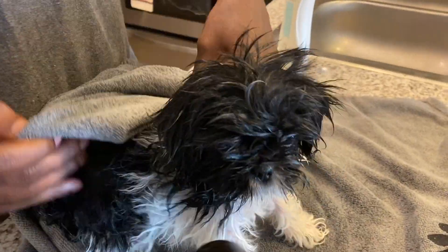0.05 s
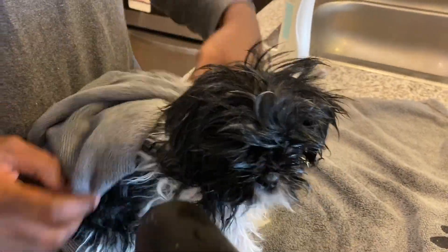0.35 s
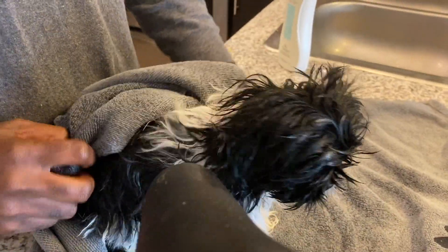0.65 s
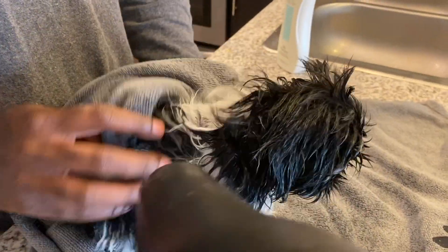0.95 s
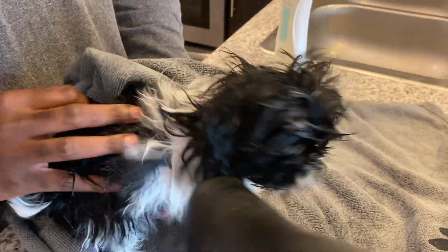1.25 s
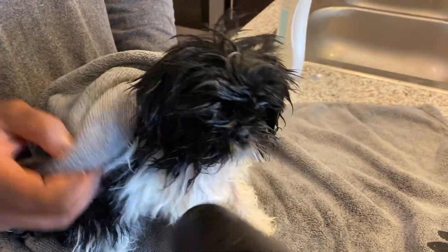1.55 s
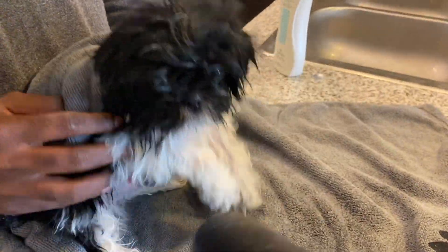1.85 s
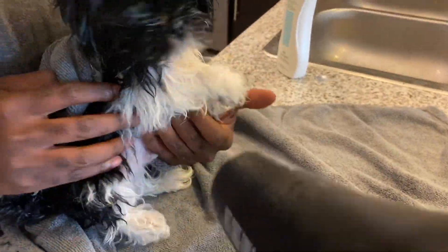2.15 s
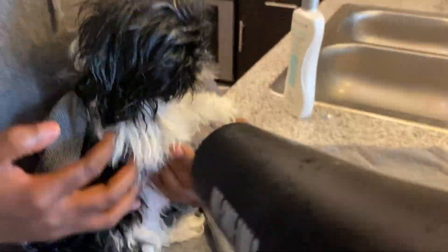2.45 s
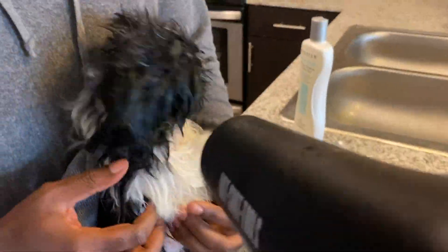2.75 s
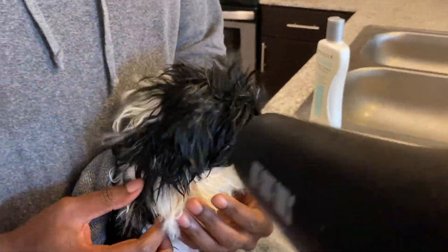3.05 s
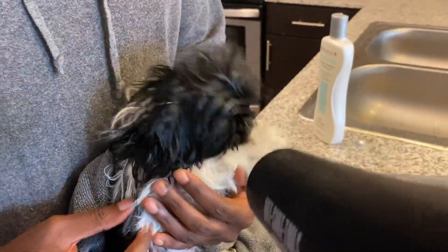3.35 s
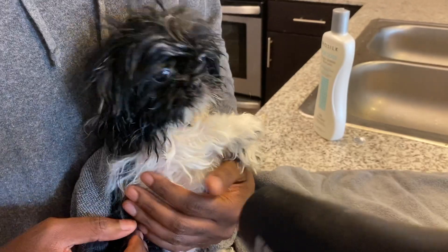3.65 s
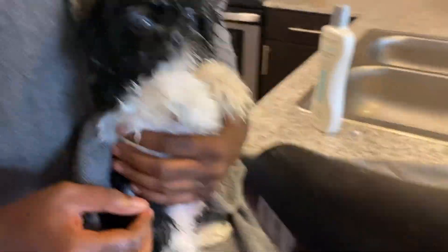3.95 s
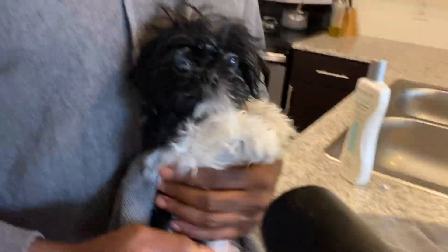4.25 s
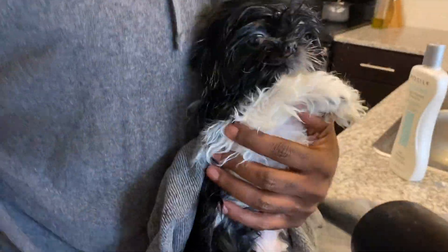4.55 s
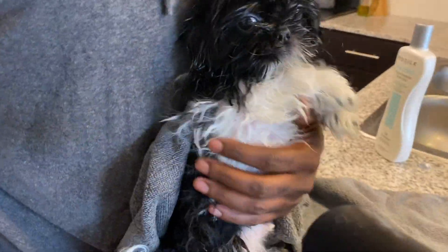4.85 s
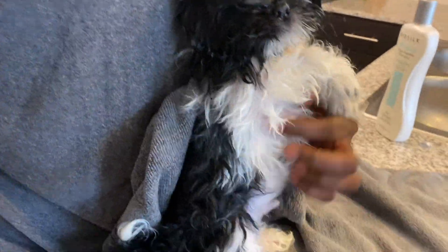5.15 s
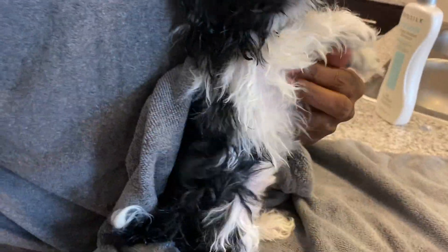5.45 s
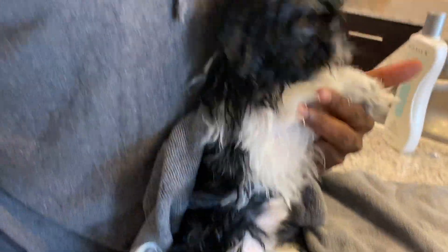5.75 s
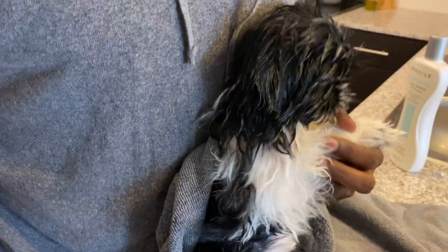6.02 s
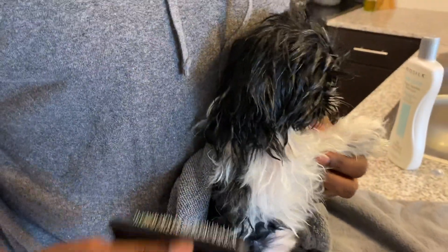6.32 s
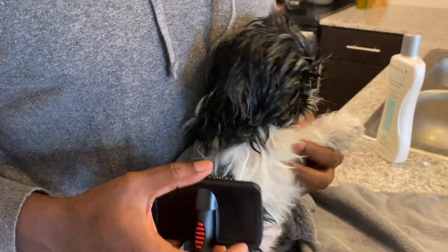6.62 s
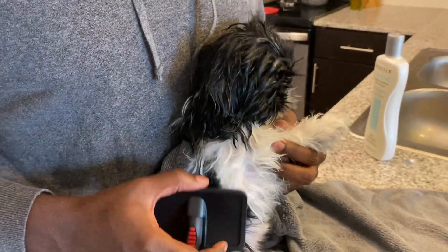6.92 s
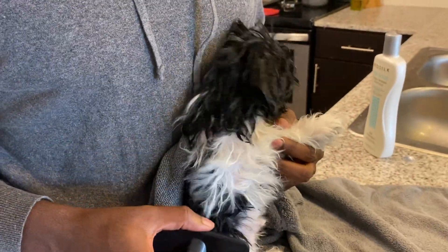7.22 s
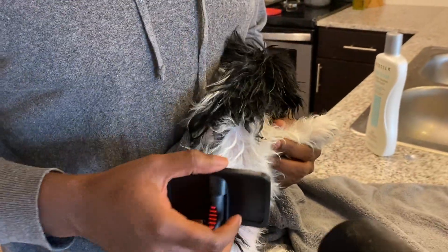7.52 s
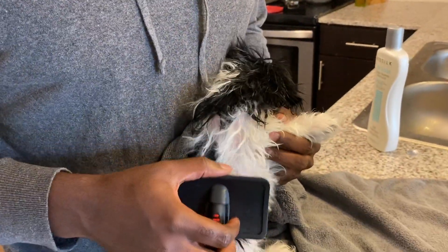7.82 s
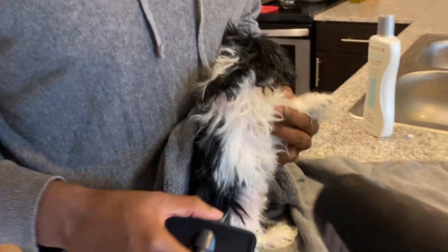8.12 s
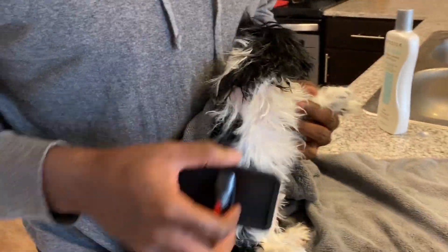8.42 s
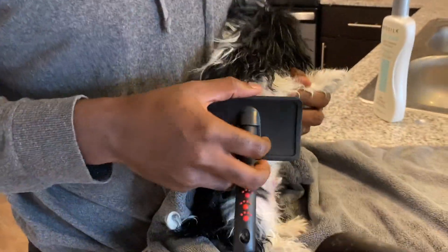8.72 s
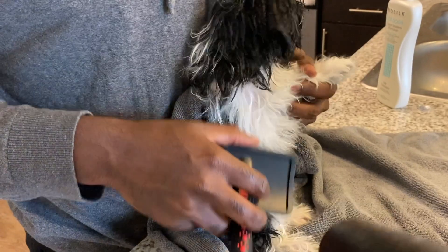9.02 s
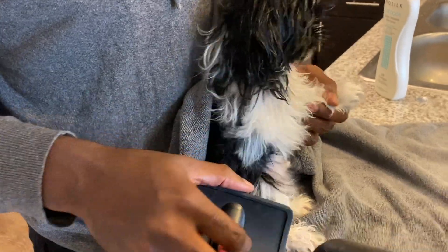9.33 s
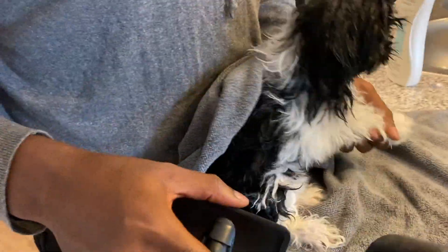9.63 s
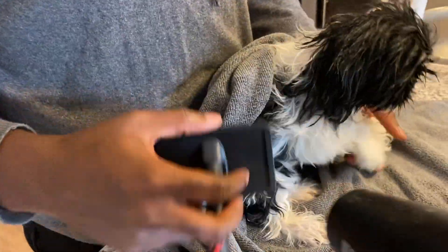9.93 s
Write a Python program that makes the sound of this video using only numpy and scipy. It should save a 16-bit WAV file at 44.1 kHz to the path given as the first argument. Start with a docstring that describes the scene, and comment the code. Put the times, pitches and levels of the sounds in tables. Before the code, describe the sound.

A hair dryer on low runs close to the microphone, drying a dog on a kitchen counter. Its hollow rush of air carries a faint fan whine and a thin motor sizzle, while gusts rumble softly on the microphone. The sound starts on the left and drifts right. About halfway, the jet swishes twice over the fur, then one light plastic knock rings briefly in the kitchen as the dryer blows on.

```python
"""Blow-drying a wet dog

A hair dryer on low moves over a dog on a kitchen counter, close to the microphone. Its fan roars
through the barrel and sings as the blades spin; its motor, fed half-waves of mains power, sizzles in
bursts. The air jet hisses in fur and towel and brushes the microphone. One light knock on plastic
makes the kitchen ring briefly."""
import sys
import numpy as np
from scipy import signal
from scipy.fft import rfft, irfft, next_fast_len
from scipy.io import wavfile
from scipy.ndimage import map_coordinates

SR = 44100
rng = np.random.default_rng(int(sys.argv[2]) if len(sys.argv) > 2 else 0)


def transcribe(u):
    """Save the signal u as a 16-bit wav file named by the first command-line argument.

    u: samples, shape (n,) or (channels, n), limited to [-1, 1]; the rate is SR.
    q: integer samples, one column per channel.
    """
    v = np.clip(np.atleast_2d(u).T, -1, 1)
    q = np.round(v * 32767).astype(np.int16)
    wavfile.write(sys.argv[1], SR, q)


N = 440118
T = np.arange(N) / SR
FREQS = np.maximum(np.arange(next_fast_len(N) // 2 + 1) * SR / next_fast_len(N), 1)
MAINS_HZ = 59.96

# How near the dryer is, given as the level of its roar: time_s, level_db
NEARNESS = [(0.0, -27), (0.8, -23), (1.25, -24), (1.5, -27), (2.05, -25.5), (2.6, -23.5), (3.0, -24),
            (3.45, -24.5), (3.75, -25), (4.0, -24.5), (4.3, -27.5), (5.3, -25), (5.8, -26.5), (6.35, -26),
            (6.9, -28), (7.3, -27), (8.0, -27), (8.3, -25), (8.65, -25.5), (9.2, -24.5), (9.6, -27),
            (9.98, -23)]
# Quick sweeps of the jet over the fur: time_s, half_length_s, strength (0-1), pitch_hz
FUR_SWEEPS = [(5.216, 0.061, 0.54, 2500), (5.515, 0.054, 0.6, 2500), (8.263, 0.048, 0.18, 2490),
              (8.534, 0.045, 0.18, 2650)]


def undb(db):
    """Turn decibels into a gain to multiply by."""
    return 10 ** (np.asarray(db) / 20)


def unit(x):
    """Scale a sound to an average (rms) level of 1."""
    return x / np.sqrt(np.mean(x ** 2))


def curves(table):
    """Join a timed table's points with straight lines, one curve per column."""
    times, *columns = np.transpose(table)
    return [np.interp(T, times, column) for column in columns]


def swell(time_s, half_length_s):
    """A smooth rise and fall around one moment."""
    return np.exp(-.5 * ((T - time_s) / half_length_s) ** 2)


def colour(x, gain):
    """Turn each frequency up or down by its own gain."""
    size = next_fast_len(N)
    return irfft(rfft(x, size) * gain, size)[..., :N]


def drift(rate_hz):
    """A smooth random wander of about 1 either way."""
    return unit(colour(rng.standard_normal(N), np.exp(-np.minimum(FREQS / rate_hz, 20) ** 2)))


def air_noise(spectrum, flutter_db, flutter_hz):
    """Three separate streams of noise that flutter together as swirls of air pass."""
    hz, db = np.transpose(spectrum)
    shape = undb(np.interp(np.log(FREQS), np.log(hz), db))
    fade_ends = np.minimum(FREQS / hz[0], 1) ** 4 * np.minimum(hz[-1] / FREQS, 1) ** 4
    streams = colour(rng.standard_normal((3, N)), shape * fade_ends)
    return unit(streams * undb(flutter_db * drift(flutter_hz)))


def resonance(x, hz, width_hz):
    """Keep one band of frequencies, whose centre may move."""
    turn = np.exp(2j * np.pi * np.cumsum(hz) / SR)
    pole = np.exp(-np.pi * width_hz / SR)
    return 2 * np.real(turn * signal.lfilter([1 - pole], [1, -pole], x * turn.conj()))


def moving_band(x, table, width_hz=146):
    """Boost or weaken one band that slides through the sound."""
    hz, boost_db = curves(table)
    return x + (undb(boost_db) - 1) * resonance(x, hz, width_hz)


def balance(pan_db):
    """Left and right gains at constant power; pan_db is left minus right."""
    sides = undb(np.array([pan_db, -pan_db]) / 2)
    return sides / np.sqrt(np.mean(sides ** 2, axis=0))


def arrive(x, lead_ms):
    """Sound reaches the nearer side first; a positive lead means the left."""
    shift = lead_ms * SR / 1000 / 2
    return np.array([map_coordinates(x, [np.arange(N) + side * shift], order=3, mode="nearest")
                     for side in (1, -1)])


def place(streams, pan_db, lead_ms, room_db):
    """One stream arrives directly; the other two are what the room scatters to left and right."""
    direct, *scattered = streams
    room = undb(room_db)
    both = arrive(direct, lead_ms) + room * np.array(scattered)
    return both * balance(pan_db) / np.sqrt(1 + room ** 2)


def hand_gain(usual_db, near, facing, nozzle_db, sweep_db):
    """A part's gain as the hand moves the dryer; near and facing are in dB per dB of their tables."""
    # How openly the air intake faces the microphone: time_s, level_db
    intake_facing = [(0.0, -35), (1.2, -34), (1.95, -35), (2.25, -43), (2.7, -43.5), (3.6, -39.5),
                     (4.05, -40.5), (4.3, -45), (4.8, -43), (5.1, -41), (6.42, -41), (6.58, -49.5),
                     (7.15, -43.5), (8.05, -42), (8.25, -39.5), (9.98, -39.5)]
    # The nozzle passes the microphone once: time_s, exposure (0-1)
    nozzle_pass = [(0, 0.16), (.55, 0.6), (1.1, 0.64), (1.4, 0.41), (1.85, 0.07), (2.25, 0)]
    near_db, = curves(NEARNESS)
    facing_db, = curves(intake_facing)
    exposure, = curves(nozzle_pass)
    sweep = sum(strength * swell(s, half_s) for s, half_s, strength, _ in FUR_SWEEPS)
    position_db = near * (near_db - near_db.mean()) + facing * (facing_db - facing_db.mean())
    return undb(usual_db + position_db + nozzle_db * exposure + sweep_db * sweep)


def barrel_roar(pan_db, lead_ms):
    """Air roars through the barrel, with a hollow resonance that swells and fades."""
    # Air in the barrel: pitch_hz, level_db
    spectrum = [(250, -27), (430, -16.5), (470, -8.5), (605, 2), (745, 0), (810, -1), (895, -1.5),
                (970, -4.5), (1070, -6), (1250, -15)]
    # The barrel's main resonance: time_s, pitch_hz, boost_db
    barrel_peak = [(0, 720, -3.5), (0.9, 720, 1.5), (2.1, 724, 1), (2.6, 706, 1.5), (3.4, 690, 3.5),
                   (4.0, 660, 1.5), (4.4, 700, -0.5), (6.8, 710, -0.5), (7.5, 666, 2.5), (8.7, 640, 2.5),
                   (9.2, 660, -0.5), (9.6, 666, -2), (9.98, 660, -7)]
    near_db, = curves(NEARNESS)
    roar = air_noise(spectrum, flutter_db=.5, flutter_hz=25) * undb(near_db + 0.28)
    return place(moving_band(roar, barrel_peak), pan_db, lead_ms, room_db=-8)


def grille_rush(pan_db, lead_ms):
    """Air rushes through the grille with a hollow colour that shifts with the aim."""
    # Air in the grille: pitch_hz, level_db
    spectrum = [(900, -15), (1130, -6), (1260, -2.5), (1440, 3.5), (1650, -0.5), (1830, 0.5), (2000, 2),
                (2125, 1), (2230, -7.5), (2600, -38)]
    # Its strongest colour: time_s, pitch_hz, boost_db
    grille_peak = [(0, 2050, -1), (1.2, 1980, 6), (2.1, 2100, 1.5), (2.45, 1680, 5), (3.9, 1690, 5.5),
                   (4.4, 2130, 3), (6.699, 2050, 2.5), (7.5, 1964, 4), (8.1, 2020, 4.5), (8.9, 1444, 0.5),
                   (9.98, 1440, 1)]
    rush = air_noise(spectrum, flutter_db=.5, flutter_hz=30)
    rush *= hand_gain(-29, near=0.8, facing=0.43, nozzle_db=-4, sweep_db=3)
    return place(moving_band(rush, grille_peak), pan_db, lead_ms, room_db=-6)


def glance(streams, strength=.16, wander=.04):
    """Hiss glances off moving hands, paws and bottle; five tiny echoes give it shifting colours."""
    out = streams.copy()
    for delay_s in np.geomspace(.0013, .0065, 5):
        earlier = np.arange(N) - SR * delay_s * (1 + wander * drift(.5))
        out += strength * np.array([np.interp(earlier, np.arange(N), x) for x in streams])
    return unit(out)


def jet_hiss():
    """The jet hisses on fur and cloth, and the gap between nozzle and dog resonates."""
    # The jet's hiss: pitch_hz, level_db
    spectrum = [(1500, -18), (2250, 1.5), (2450, 3.5), (2800, 2), (2980, 0.5), (3200, 0), (3450, -1.5),
                (4100, -2), (4550, -4), (4900, -5.5), (6000, -9), (7300, -6), (8300, -14.5), (10000, -62)]
    # The gap's lower and upper resonances: time_s, pitch_hz, boost_db
    lower_peak = [(0, 3160, 7), (0.6, 3400, 3.5), (1.3, 3280, 5), (2.1, 3380, 5.5), (2.4, 3700, -1),
                  (3.1, 4050, 1), (3.6, 3880, -8), (3.9, 3810, 5), (4.4, 3380, 8.5), (4.9, 3430, 3),
                  (5.25, 3470, 5.5), (5.802, 3250, -2), (6.399, 3330, 4.5), (7.0, 3430, 6.5),
                  (7.6, 3410, 6), (8.1, 3460, 3), (9.2, 3400, -4), (9.65, 4050, 3), (9.98, 3910, -2)]
    upper_peak = [(0, 5400, 1), (0.75, 5200, 2), (1.4, 5300, 0), (2.1, 5400, 6), (2.6, 4600, 2),
                  (3.1, 4600, 5), (3.75, 4120, -1), (4.3, 4400, 1), (5.0, 4040, 5.5), (5.5, 4300, -2),
                  (6.5, 4060, 0.5), (7.3, 4100, -4), (7.9, 4350, 1), (8.7, 4280, 4), (9.6, 4500, 2)]
    hiss = glance(air_noise(spectrum, flutter_db=0.54, flutter_hz=59.6))
    hiss *= hand_gain(-35, near=0.06, facing=0.34, nozzle_db=5.5, sweep_db=5.5)
    return moving_band(moving_band(hiss, lower_peak), upper_peak)


def sparks(turns):
    """The motor's brushes spark while current flows, most at one spot of each turn."""
    current = np.maximum(np.sin(2 * np.pi * MAINS_HZ * T + 1.8), 0)  # a diode blocks every other half-wave
    return current * (1 + .7 * np.sin(2 * np.pi * turns))


def rubbed_metal(rings, pressure):
    """Rubbing brushes make metal ring, more strongly the harder they press."""
    metal = sum((-1) ** k * undb(db) / (1 + 1j * (FREQS / hz - hz / FREQS) * hz / width_hz)
                for k, (hz, width_hz, db) in enumerate(rings))
    return unit(colour(rng.standard_normal((3, N)) * pressure, metal))


def motor_sizzle(sparking, pan_db):
    """Sparking brushes ring the motor's case and their holder, which beams out through the intake."""
    # Rings of the case and of the brush holder: pitch_hz, width_hz, level_db
    case_rings = [(5270, 260, -5), (6730, 260, 0), (7000, 340, -2.5), (7550, 600, -10)]
    holder_rings = [(6070, 280, 0), (6400, 400, -5)]
    # The brightest ring shifts as the intake turns: time_s, pitch_hz, boost_db
    bright_peak = [(0, 6990, 3.5), (1.3, 6900, 7.5), (1.85, 6200, -1.5), (2.4, 6000, 6.5), (3.05, 5470, 8),
                   (3.3, 6300, 3), (3.6, 6400, 2), (4.2, 6290, 3), (5.199, 6850, -2), (6.3, 6150, 3),
                   (6.7, 6600, 5.5), (7.499, 6800, 3.5), (8.5, 6740, 3.5), (9.1, 6100, 3.5),
                   (9.45, 5730, 6.5), (9.98, 6500, 2)]
    pressure = (1 + 0.55 * sparking) * undb(2.5 * drift(300))
    case = rubbed_metal(case_rings, pressure)
    case *= hand_gain(-47, near=0, facing=1.1, nozzle_db=-4.2, sweep_db=18)
    holder = rubbed_metal(holder_rings, pressure)
    holder *= hand_gain(-49, near=1, facing=2, nozzle_db=-19, sweep_db=15)
    sizzle = moving_band(case + holder, bright_peak, width_hz=810)
    return place(sizzle, pan_db, lead_ms=0, room_db=-10.5)


def high_hiss(sparking):
    """The dryer's high, airy hiss pulses with the motor."""
    # Tone of the high hiss: pitch_hz, level_db
    spectrum = [(4000, -12), (7400, 0), (9000, -2), (10300, 2.2), (12200, 1), (13200, -5.5), (14500, -3),
                (15800, -4)]
    hiss = glance(air_noise(spectrum, flutter_db=1, flutter_hz=50)) * undb(1.8 * sparking)
    hiss *= hand_gain(-47.4, near=0.04, facing=0.6, nozzle_db=7.2, sweep_db=7.5)
    return place(hiss, pan_db=np.zeros(N), lead_ms=0, room_db=1.5)


def fan_tones(turns, blade_db, waver_db=2.1, wobble_radians=.42):
    """Seven blades and a slightly unbalanced rotor sing; uneven inflow shakes every tone."""
    # Tones of fan and rotor: cycles_per_turn, offset_db
    harmonics = [(2, -18), (5, -5.5), (7, -0.3), (8, -6), (10, -11.5), (11, -12), (12, -6.5), (14, -7)]
    # The rotor's hum, one cycle per turn: time_s, level_db
    rotor_hum = [(0, -54), (1.0, -41.5), (1.9, -49), (2.5, -43.5), (3.3, -46.5), (4.1, -47.5), (4.7, -50),
                 (5.3, -53.5), (6.7, -54.5), (7.7, -49.5), (9.2, -51), (9.98, -59)]
    # The sixth harmonic swells and fades as the barrel turns: time_s, level_db
    sixth_harmonic = [(0, -37.5), (1.3, -43), (1.8, -42), (2.2, -37), (2.7, -38), (3.3, -38), (3.9, -42),
                      (4.6, -48), (5.7, -44), (6.6, -43), (7.6, -38.5), (8.3, -34.5), (9.0, -48),
                      (9.98, -46)]
    # The blade tone beams out of the nozzle; these others follow the aim half as much.
    aim_db = (blade_db + blade_db.mean()) / 2
    tones = [(round(cycles), db + (blade_db if cycles == 7 else aim_db)) for cycles, db in harmonics]
    tones += [(1, curves(rotor_hum)[0]), (6, curves(sixth_harmonic)[0])]
    out = 0
    for cycles, db in tones:
        shake = wobble_radians * min(cycles / 7, 1) * drift(18)
        out += undb(db + waver_db * drift(8.5)) * np.sin(2 * np.pi * cycles * turns + shake)
    return np.sqrt(2) * out


def whistles(width_hz=3):
    """The flow keeps narrow resonances of the housing ringing."""
    # The housing's whistles: pitch_hz, level_db
    notes = [(755, -39), (2118, -48)]
    out = 0
    for hz, db in notes:
        waver = drift(width_hz) + 1j * drift(width_hz)
        out += undb(db) * np.real(waver * np.exp(2j * np.pi * hz * T))
    return out


def mains_hum():
    """The half-waves of mains current shake the whole dryer."""
    # Tones of the hum: multiple_of_mains, level_db
    tones = [(1, -53.5), (2, -60)]
    return sum(undb(db) * np.sqrt(2) * np.sin(2 * np.pi * round(k) * MAINS_HZ * T) for k, db in tones)


def low_air(spectrum, shared, flutter_db):
    """Low air noise, partly the same on both sides and partly each side's own."""
    common, *own = air_noise(spectrum, flutter_db, flutter_hz=21)
    return unit(shared * common + np.array(own))


def draught():
    """Gusts from the dryer rumble on the microphone."""
    # The rumble: pitch_hz, level_db
    spectrum = [(20, -32), (40, -23), (58, -2.5), (78, -3), (105, 1.5), (170, -4.5), (260, -7), (420, -13),
                (900, -13)]
    # Strength of the gusts: time_s, level_db
    gusts = [(0, -44), (0.28, -35), (0.4, -30.5), (0.85, -28), (1.3, -31.5), (1.9, -35), (2.3, -37.5),
             (2.8, -41.5), (3.2, -40), (3.9, -41), (4.8, -40), (5.1, -36.5), (5.5, -35.5), (5.7, -40),
             (6.35, -39.5), (6.7, -44.5), (7.8, -46), (8.3, -39), (9.0, -43), (9.98, -38.5)]
    gust_db, = curves(gusts)
    return low_air(spectrum, shared=.9, flutter_db=1) * undb(gust_db)


def air_stream():
    """The stream of air makes a steady low rush."""
    # The low rush: pitch_hz, level_db
    spectrum = [(45, -11), (75, -33), (115, 0), (200, -3), (350, -2.5), (480, -3), (800, -30)]
    rush = low_air(spectrum, shared=0.57, flutter_db=1.5)
    return rush * hand_gain(-41.5, near=-0.55, facing=0.18, nozzle_db=-2.5, sweep_db=0)


def graze(level_db=-34.5):
    """The hiss swells as the edge of the jet passes the microphone."""
    # The jet's edge: pitch_hz, level_db
    spectrum = [(2600, -7), (3050, 6.5), (3400, -9), (3850, 3), (4600, -7), (5000, -21)]
    hiss = air_noise(spectrum, flutter_db=2, flutter_hz=30)
    return hiss * swell(time_s=0.75, half_length_s=0.37) * undb(level_db)


def swishes(width_hz=140, rise_hz=220):
    """The jet crosses the hollow between paw and hand: a breathy note rises and falls with each sweep."""
    _, _, top_hz = curves(FUR_SWEEPS)
    height = sum(swell(s, half_s) for s, half_s, _, _ in FUR_SWEEPS)
    force = sum(strength * swell(s, half_s) for s, half_s, strength, _ in FUR_SWEEPS)
    pitch_hz = top_hz - rise_hz * (1 - height)
    air = resonance(rng.standard_normal((3, N)), pitch_hz, width_hz)
    return unit(resonance(air, pitch_hz, 2 * width_hz)) * force * undb(-30)


def plastic_knock(contact_s=0.00025, low_cut_hz=700):
    """A light blow rings hard plastic; the soft contact dulls it and it carries little bass."""
    # The blow: start_s, peak_db
    knocks = [(5.8947, -10.8)]
    # Rings of the plastic: pitch_hz, level_db, fade_s (time to fall 60 dB)
    rings = [(1120, -2, .02), (1900, -2, .016), (2500, -3, .013), (3200, -3, .016), (4500, -7, .008)]
    t = T[:SR // 10]
    ring = sum(undb(db - 60 * t / fade_s) * np.sin(2 * np.pi * hz * t) for hz, db, fade_s in rings)
    push = np.sin(np.pi * np.minimum(t / contact_s, 1))
    ring = signal.fftconvolve(ring, push)
    ring = signal.sosfilt(signal.butter(2, low_cut_hz, "high", fs=SR, output="sos"), ring)
    blows = np.zeros(N)
    for start_s, peak_db in knocks:
        blows[int(start_s * SR)] = undb(peak_db)
    return signal.fftconvolve(blows, ring / np.abs(ring).max())[:N]


def kitchen_echo(x, fade_s=0.44):
    """Counter and cupboards ring briefly, differently on each side."""
    t = T[:SR // 2]
    tails = rng.standard_normal((2, len(t))) * undb(-60 * t / fade_s)
    return signal.fftconvolve(x[None], unit(tails) / np.sqrt(len(t)), axes=1)[:, :N]


def counter_echo(x, delay_ms=0.7):
    """The counter reflects the rush as the dryer is lowered, making it slightly hollow."""
    # The reflection: time_s, strength (0-1)
    reflection = [(8.8, 0), (9.4, 0.2), (9.98, 0.25)]
    strength, = curves(reflection)
    earlier = np.arange(N) - delay_ms * SR / 1000
    return strength * np.array([map_coordinates(side, [earlier], order=1) for side in x])


def scene():
    """The dryer's parts, placed by where it is held, with the draught and the knock."""
    # The motor and its blade tone: time_s, speed_hz, blade_db
    motor = [(0.0, 146.2, -34), (2.2, 147.7, -35.5), (2.35, 146.5, -44), (3.9, 145.5, -43),
             (4.3, 145.4, -36), (5.3, 145.7, -36.5), (6.8, 145.8, -38.5), (7.5, 146.8, -40.5),
             (7.9, 145.8, -38.5), (8.25, 146.5, -39), (8.6, 147.2, -35.5), (9.15, 146, -36.5),
             (9.98, 146.3, -51)]
    # The dryer swings from side to side: time_s, pan_db, left_lead_ms
    swing = [(0.0, 0.5, 0.045), (0.6, 13, 0.14), (1.1, 10.5, 0.12), (1.85, 1, 0.031), (2.35, -7, -0.11),
             (3.2, -7.5, -0.13), (3.9, -7, -0.13), (4.35, -1, 0.035), (4.75, -7, -0.092),
             (5.15, -1.5, 0.0106), (5.65, -5, -0.041), (7.2, -4.5, -0.026), (9.0, -8, -0.14),
             (9.98, -11, -0.21)]
    # Directions of hiss and sizzle: time_s, jet_pan_db, sizzle_pan_db
    directions = [(0.0, 2, 9), (0.3, 10, 0), (0.77, 10.5, -2), (1.78, 5, 5), (1.92, 1.5, 2), (4.03, 1.5, 0),
                  (4.14, 4, 9), (4.28, 4.5, -10), (5.34, 1.5, 6), (5.84, 5, 3.5), (7.17, 5, -4),
                  (8.56, 2.5, 3.5), (9.84, -0.5, 1), (9.98, 2, 1.0)]
    # A dip slides down through the rush as the dryer is lowered and turned: time_s, pitch_hz, boost_db
    rush_dip = [(0, 3220, -3.5), (1.9, 3210, -3.5), (2.6, 3130, -2), (4.4, 3210, -3), (7.6, 3220, -5.5),
                (8.3, 3220, -8), (8.7, 3100, -2), (9.25, 2600, -5), (9.6, 2540, -6), (9.98, 2230, -4)]
    # A narrow band of the hiss, mostly a dip, shifts with the aim: time_s, pitch_hz, boost_db
    hiss_dip = [(0, 4900, -3), (1.2, 4900, -3.5), (2.1, 4950, -4), (2.8, 5050, 2), (3.9, 4950, -9),
                (4.5, 5550, 4), (5.5, 5600, -7), (6.7, 5500, 3), (7.7, 5510, -6), (8.3, 4850, -6),
                (9.1, 4900, -4), (9.6, 5150, 0), (9.98, 4950, -5)]
    speed_hz, blade_db = curves(motor)
    swing_db, lead_ms = curves(swing)
    jet_pan_db, sizzle_pan_db = curves(directions)
    grille_pan_db = 3 + 0.36 * swing_db
    turns = np.cumsum(speed_hz) / SR
    sparking = sparks(turns)

    rush = barrel_roar(swing_db, lead_ms) + grille_rush(grille_pan_db, lead_ms)
    hiss = place(jet_hiss() + graze() + swishes(), jet_pan_db, lead_ms, room_db=3.5)
    dryer = moving_band(rush + counter_echo(rush) + hiss, rush_dip, width_hz=324)
    dryer += motor_sizzle(sparking, sizzle_pan_db) + high_hiss(sparking)
    dryer = moving_band(dryer, hiss_dip, width_hz=240)
    dryer += arrive(fan_tones(turns, blade_db) + whistles(), lead_ms) * balance(grille_pan_db)
    wind = (draught() + air_stream()) * balance(pan_db=2.2)[:, None]
    knock = plastic_knock()
    knock_in_room = knock * balance(pan_db=9)[:, None] + undb(-9) * kitchen_echo(knock)
    return dryer + mains_hum() + wind + knock_in_room


def record(dry):
    """Cut off the highest treble."""
    top_hz = 15850
    return signal.sosfilt(signal.ellip(10, .1, 80, top_hz, fs=SR, output="sos"), dry)


dry = scene()
out = record(dry)
transcribe(out)
```